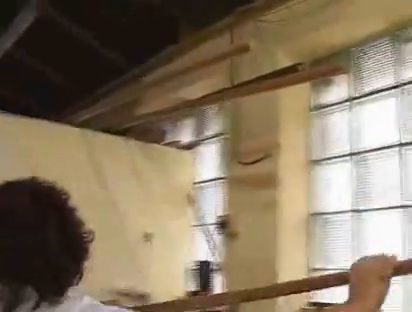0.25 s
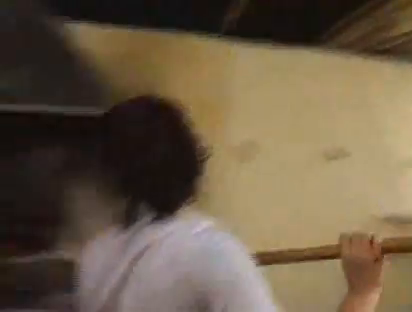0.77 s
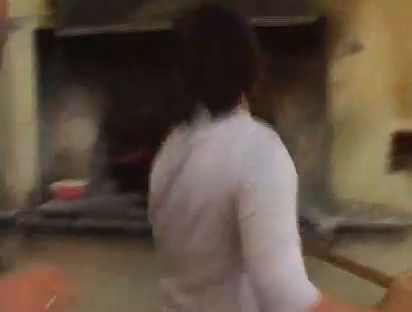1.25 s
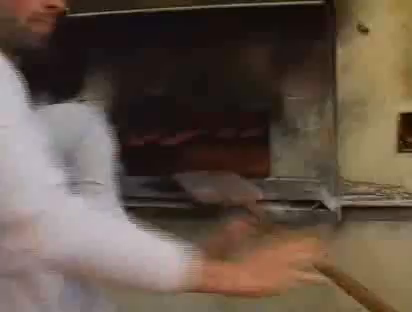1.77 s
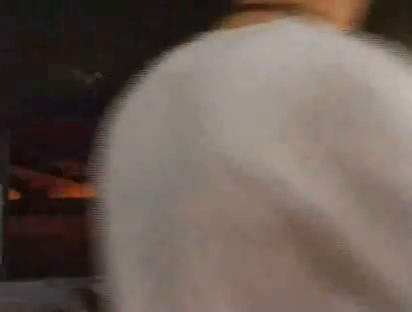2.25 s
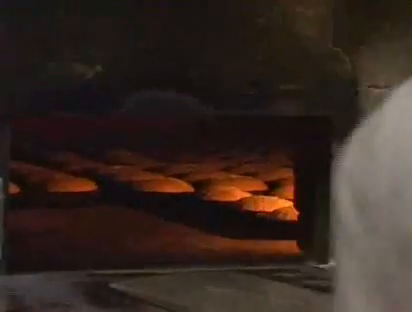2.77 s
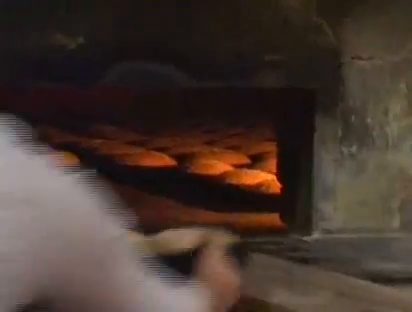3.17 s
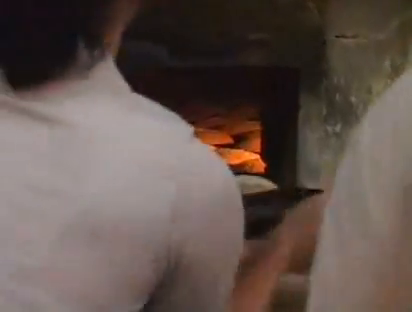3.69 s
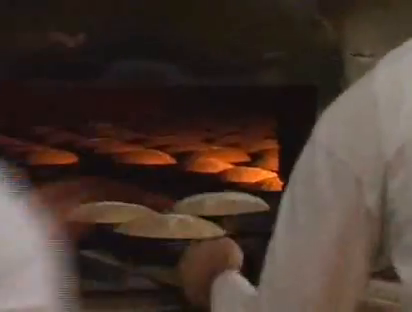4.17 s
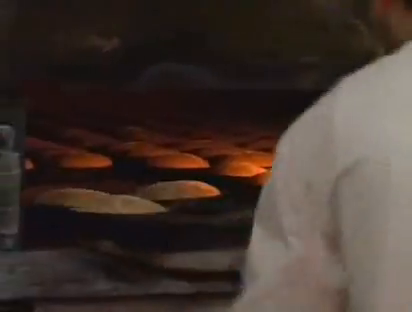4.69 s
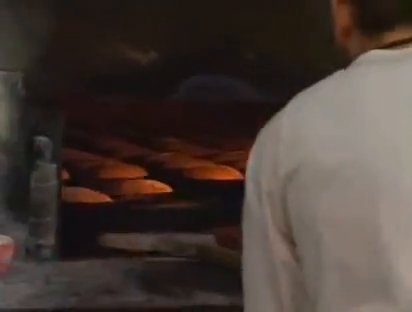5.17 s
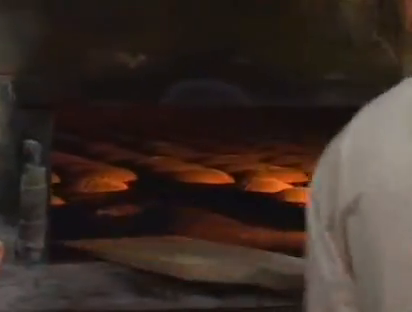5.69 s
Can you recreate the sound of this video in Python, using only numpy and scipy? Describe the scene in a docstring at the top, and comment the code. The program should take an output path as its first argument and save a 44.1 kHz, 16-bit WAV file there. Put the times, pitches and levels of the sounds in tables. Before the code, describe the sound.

A long wooden peel knocks, clatters and scrapes over the floury stone of a bread oven in a hard-walled bakery.

```python
"""Wooden peel at a bread oven

A long wooden peel knocks and clatters on the mouth and floor of the oven, then is loaded and slid in.
Each blow rings the blade and shaft; wood rasps over floury stone in quick strokes and one long gritty push.
A loading board rings as it is set down, the blade as it springs free. The place is a hard-walled bakery,
with the peel straight ahead of a hand-held camera microphone that hears it nearly in mono."""
import sys
import numpy as np
from scipy import signal
from scipy.fft import rfft, irfft
from scipy.io import wavfile
from scipy.ndimage import uniform_filter1d, minimum_filter1d

SR = 44100
rng = np.random.default_rng(int(sys.argv[2]) if len(sys.argv) > 2 else 0)


def dump_mix(stems):
    """Bounce the given channels to the path in sys.argv[1] as a 16-bit WAV at rate SR."""
    frames = np.atleast_2d(stems).T  # one column per channel
    limited = np.clip(frames, -1, 1)  # hard clip at full scale
    pcm = np.round(limited * 32767).astype(np.int16)
    wavfile.write(sys.argv[1], SR, pcm)


N = 261954
TIME = np.arange(N) / SR
TAPS = 8192
FREQS = np.maximum(np.arange(TAPS // 2 + 1) * SR / TAPS, 1)

# Room tone of the bakery. Each row: frequency in Hz, relative level in dB.
ROOM_TONE_SPECTRUM = [(25, -4.5), (60, -10), (120, -9), (250, 3), (500, -1.5), (1000, -5), (2500, -9),
                      (5000, -13), (9000, -12.5), (13000, -11.5)]
# Echo off the walls. Each row: frequency in Hz, t60 in seconds, level against the direct sound in dB.
ECHO_BANDS = [(100, 0.8, 0), (256, 0.52, 3.5), (624, 0.44, 0.5), (1310, 0.49, -0.5), (3770, 0.37, -5),
              (8140, 0.32, -8.5), (13000, .3, -14)]
# How far left and right differ at the microphone. Each row: frequency in Hz, side gain in dB.
STEREO_WIDTH = [(60, -11), (150, -28), (380, -40), (700, -25.5), (1400, -24), (2500, -20), (5500, -18.5),
                (9000, -46), (13000, -31)]
# The microphone's own colour. Each row: frequency in Hz, gain in dB.
MIC_RESPONSE = [(30, -3), (90, -1), (1300, 0), (3500, 0), (5200, 0.5), (7500, -1), (10500, -1), (12800, -3)]
# Faint rumble, unrelated in the two channels. Each row: frequency in Hz, relative level in dB.
MIC_RUMBLE_SPECTRUM = [(20, 1), (45, 9), (100, -13), (250, -22), (1000, -34), (8000, -50)]
# Modes of the loading board and the thin blade. Each row: frequency in Hz, level in dB, t60 in seconds.
BOARD_MODES = [(656, -26, 0.71), (990, -53, 0.37), (1280, -30.5, 0.55), (1744, -54, .3), (2070, -29, 0.43),
               (2630, -45, 0.64)]
BLADE_MODES = [(1160, -39, 0.61), (1440, -24, 0.32), (1650, -35, 0.17), (2002, -22.5, 0.21),
               (2560, -28, 0.13), (2660, -30, 0.17), (3380, -28.5, 0.17)]
# Resonances of peel and oven mouth. Each row: frequency in Hz, width in Hz, relative lift in dB.
PEEL_MODES = [(139, 20, 3), (233, 53, 3), (359.3, 38, 2), (465, 13, -1.5), (757, 48, 1.5), (983, 36, -0.5),
              (1172, 17, 2.5), (1584, 30, 0), (1750, 41, 0.5), (1940, 47, 1.5), (2243, 120, 2.5),
              (2500, 170, 0), (3260, 150, 0.5), (4950, 250, 2.5)]
# Quick strokes over floury stone. Each row: fastest moment, rise and fall in seconds, relative level
# in dB, hiss centre in Hz, loss an octave above it in dB, shaft rumble against the hiss in dB.
STROKES = [ (.605, 0.045, 0.039, -43, 3970, 7, -31), (0.949, 0.033, 0.028, -36.5, 7260, 23, 4),
           (1.41, 0.051, .025, -41, 7400, 20, -8), (1.581, 0.025, 0.022, -40, 6660, 18, -14),
           (1.672, 0.021, 0.026, -34, 7860, 14, -7.5), (2.497, 0.026, 0.062, -27, 5070, 14, -6.5),
           (2.872, 0.023, 0.028, -37, 4580, 7, -19), (4.501, 0.038, 0.015, -38.5, 4500, 14.5, -33),
           (5.625, 0.015, 0.12, -34, 3770, 15, -7.5), ]
# Juddering shaft, rasping grit and shaken wood. Each row: frequency in Hz, relative level in dB.
SHAFT_SPECTRUM = [(50, -55), (100, -5), (150, 0.5), (300, 4.5), (480, 6.5), (750, -6.5), (1500, -4.5),
                  (4000, -26)]
RASP_SPECTRUM = [(300, -32), (1500, -12), (3200, -0.5), (4800, 1), (7000, -2), (10000, -10), (13000, -15)]
WOOD_SPECTRUM = [(60, -23), (130, -15), (280, -1.5), (600, -3.5), (1350, 0.5), (2400, -4), (4000, -7),
                 (8000, -33)]
# Slow slides as the peel is shifted and loaded. Each row: start in seconds, length in seconds,
# speed as a gain in dB, load against that gain in dB.
SLIDES = [(0, 0.033, -56.5, 2.5), (0.286, 0.62, -63.5, -9), (1.0, 0.43, -47.5, 6), (1.8, 0.092, -48, 0.5),
          (1.969, 0.75, -48.5, -1.5), (2.995, 0.083, -52, -1.5), (3.165, 0.16, -52.5, -8),
          (3.348, 0.45, -44, -2.5), (3.846, 0.3, -57, 6), (4.14, 0.19, -48, 1), (4.332, 0.29, -45.5, -6)]
# The long push into the oven and back. Each row: time in seconds, relative speed and load in dB.
LONG_PUSH = [(4.72, -46, -41), (4.76, -49, -39.5), (4.99, -45.5, -41.5), (5.12, -48, -40),
             (5.23, -52.5, -43.5), (5.438, -47.5, -53.5), (5.572, -43.5, -41), (5.706, -46.5, -34),
             (5.828, -42.5, -44), (5.92, -56, -49)]
# Tone of a blow: weight fills the bass, hardness opens the treble. Each row: frequency in Hz,
# base level in dB, dB added per dB of weight, dB added per dB of hardness.
BLOW_SPECTRUM = [(65, -32, 1, 0), (133.7, -7.5, 0.5, 0), (220, .5, 1, 0), (580, 2, .5, 0),
                 (1416, 1.5, 0, 0), (3440, -0.5, 0, 1), (8380, -11, 0, 2.4), (13000, -30.5, 0, 0.6)]
# Blows of wood on stone, each favouring one note by where the peel is struck. Each row: start in seconds,
# relative level in dB, weight in dB, contact hardness in dB, clatter time in seconds, note in Hz.
KNOCKS = [(.075, -20, -7, 1, 0.017, 1030), (0.419, -31, 0, 7.5, .008, 8000),
          (.461, -21.5, -10, 6, .02, 1760), (.772, -24.5, -5, 6.5, 0.012, 4770),
          (.84, 17, -0.5, -2.5, 0.019, 235), (.948, 6.5, -4, 1, 0.011, 600),
          (.956, 17, -0.5, -1.5, .013, 4900), (1.013, 10.5, -5, -4, 0.012, 347),
          (1.127, 12, -3.5, -5.5, 0.02, 3130), (1.158, 18.5, -2, -3, .009, 4840),
          (1.335, 23, -9, -11.5, .016, 880), (1.498, 17.5, -0.5, -7.5, 0.035, 604),
          (2.119, 28.5, -8, -8, 0.019, 965), (2.166, 18.5, 1, -5.5, 0.034, 358),
          (2.332, 13, 5.5, -16.5, 0.0094, 810), (2.345, 12.5, 4.5, -12, 0.018, 460),
          (3.315, 18.5, -6.5, -9, .014, 1570), (3.61, 4, -18, -13, 0.017, 1300),
          (3.735, 10.5, -13.5, -1.5, 0.015, 4950), (4.018, 21, -16, -11.5, 0.037, 670),
          (4.41, -7.5, 6, -1, 0.014, 285), (4.568, 7.5, -13.5, -3.5, .018, 2380),
          (4.712, 14, -17, -4, 0.0097, 2550), (4.808, 1.5, -10, -2, 0.013, 1670),
          (5.15, 3, -19, -4.5, 0.024, 3300), (5.403, 3, -25, -3, 0.011, 915),
          (5.532, 8.5, -8.5, -17, 0.011, 1600), (5.58, 11, -13, -2, 0.017, 350),
          (5.605, 11.5, -7.5, 0, 0.023, 363), (5.638, 2, 10.5, -15, 0.017, 355),
          (5.748, 16, -13.5, -4.5, 0.022, 2030)]


def undb(db):
    """Decibels to gain."""
    return 10 ** (np.asarray(db) / 20)


def unit(x):
    """Scale to rms 1."""
    return x / np.sqrt(np.mean(x ** 2))


def spectrum(points):
    """Join (Hz, dB) points on a log-frequency axis."""
    hz, db = np.transpose(points)
    return np.interp(np.log(FREQS), np.log(hz), db)


def bell(hz, width):
    """Shape of one resonance: 1 at its centre, a half at its edges."""
    return 1 / (1 + (2 * (FREQS - hz) / width) ** 2)


def colour(x, db):
    """Pass x through the minimum-phase filter that has this dB spectrum."""
    cepstrum = irfft(np.log(undb(db)))
    cepstrum[1:TAPS // 2] *= 2
    cepstrum[TAPS // 2 + 1:] = 0
    impulse = irfft(np.exp(rfft(cepstrum)))
    return signal.fftconvolve(x, impulse)[:len(x)]


def add(track, start_s, sound):
    """Mix a sound into the track."""
    start = max(int(start_s * SR), 0)
    part = sound[:max(N - start, 0)]
    track[start:start + len(part)] += part


def grit(samples, per_s, spread_db):
    """Random tiny impacts, a few much larger than the rest; rms 1."""
    size = undb(spread_db * np.minimum(rng.exponential(size=samples), 4))
    return unit(size * rng.standard_normal(samples) * (rng.random(samples) < per_s / SR))


def wander(per_s):
    """Smooth random drift with a spread near 1 and no wild excursions."""
    knots = 2 * np.tanh(rng.standard_normal(1024) / np.sqrt(2))
    return np.interp(TIME * per_s, np.arange(len(knots)), knots)


def room_tone(level_db=-57.5, waver_db=0.87):
    """The faint, slowly wavering air of the bakery."""
    gain = undb(level_db + waver_db * wander(per_s=2.6))
    return gain * unit(colour(rng.standard_normal(N), spectrum(ROOM_TONE_SPECTRUM)))


def wall_echo(build_s=0.0095):
    """The walls' diffuse response builds up after the direct sound; the treble dies first."""
    t, echo = np.arange(SR) / SR, 0
    hz, t60s, levels_db = np.transpose(ECHO_BANDS)
    noise, bins = rfft(rng.standard_normal(SR)), np.arange(SR // 2 + 1)
    build = 1 - np.exp(-(t / build_s) ** 4)
    edges = 60 * 2 ** (np.arange(17) / 2)  # half octaves
    for lo, hi in zip(edges, edges[1:]):
        t60, db = (np.interp(np.log(lo * hi) / 2, np.log(hz), column) for column in (t60s, levels_db))
        band = irfft(noise * ((bins >= lo) & (bins < hi)))
        tail = band * np.exp(-np.log(1000) * t / t60) * build
        echo += undb(db) * unit(tail) * np.sqrt(2 * (hi - lo)) / SR
    return echo


def evened(echo):
    """Level out narrow peaks and dips, so that the echo has no pitch of its own."""
    power = np.abs(rfft(echo)) ** 2
    power += 1e-6 * power.mean()
    excess_db = 10 * np.log10(uniform_filter1d(power, size=21) / uniform_filter1d(power, size=161))
    return colour(echo, -np.interp(FREQS, np.arange(len(power)), excess_db))


def free_ring(modes, start_s):
    """Board or blade rings on after a knock, each mode dying at its own rate."""
    track, t = np.zeros(N), np.arange(SR) / SR
    for hz, db, t60 in modes:
        add(track, start_s, undb(db) * np.cos(2 * np.pi * hz * t) * np.exp(-np.log(1000) * t / t60))
    return track


def peel_resonance():
    """The dB lift that the modes give to whatever shakes the peel."""
    return sum(db * bell(hz, width) for hz, width, db in PEEL_MODES) - 0.5


def flour_strokes(rise_db_per_octave=2.5, bass_cut_hz=350, flutter_db=1.5):
    """Fine flour hisses under a quick stroke while the shaft judders low."""
    track, t = np.zeros(N), np.arange(SR // 2) / SR - 1 / 4
    shaft_db = spectrum(SHAFT_SPECTRUM) + peel_resonance()
    bass_loss_db = 20 * np.log10(1 + (bass_cut_hz / FREQS) ** 2)
    for peak_s, rise_s, fall_s, db, centre_hz, loss_db, rumble_db in STROKES:
        speed = np.exp(-(t / np.where(t < 0, rise_s, fall_s)) ** 2 / 2)
        octaves = np.log2(FREQS / centre_hz)
        # the hiss thins gently below its centre, fast above it
        hiss_db = rise_db_per_octave * np.minimum(octaves, 0) - loss_db * np.maximum(octaves, 0) ** 1.5
        hiss = unit(colour(grit(len(t), per_s=16000, spread_db=0.5), hiss_db - bass_loss_db))
        rumble = unit(colour(grit(len(t), per_s=900, spread_db=3), shaft_db))
        add(track, peak_s + t[0], undb(db - 0.5) * speed * (hiss + undb(rumble_db) * rumble))
    return track * undb(flutter_db * wander(per_s=70))


def blade_chatter(width_hz=300, shift_db=5, shifts_per_s=26):
    """Slips shake the stone-damped blade; as the contact wanders, different modes stand out."""
    chatter = 0
    for hz, db, _ in BLADE_MODES:
        mode_db = 30 * np.log10(bell(hz, width_hz) + 1e-4)
        mode = unit(colour(grit(N, per_s=900, spread_db=2.5), mode_db))
        # pressed on the stone, the modes differ only half as much as when they ring free
        chatter += mode * undb(db / 2 + shift_db * wander(shifts_per_s))
    return unit(chatter)


def speed_and_load(push_fade_s=0.042, attack_s=0.03, release_s=0.043):
    """Two gains for the moving blade: the long push swells and eases; slides start, hold and die away."""
    times, speeds_db, loads_db = np.transpose(LONG_PUSH)
    pushing = np.clip(1 + np.minimum(TIME - times[0], times[-1] - TIME) / push_fade_s, 0, 1)
    speed = pushing * undb(np.interp(TIME, times, speeds_db) + 2.5)
    load = pushing * undb(np.interp(TIME, times, loads_db) + 1)
    for start_s, length_s, db, load_db in SLIDES:
        attack = np.clip((TIME - start_s) / attack_s, 0, 1)
        release = np.exp(-np.maximum(TIME - start_s - length_s, 0) / release_s)
        speed += undb(db) * attack * release
        load += undb(db + load_db) * attack * release
    return speed, load


def blade_drag(slip_db=2.1, slips_per_s=45, rasp_db=-1, wood_db=-4, chatter_db=-7):
    """The blade sticks and slips over grit: the grains rasp, and under load they shake the wood."""
    speed, load = speed_and_load()
    rasp = unit(colour(grit(N, per_s=16000, spread_db=1), spectrum(RASP_SPECTRUM)))
    wood = unit(colour(grit(N, per_s=2500, spread_db=3), spectrum(WOOD_SPECTRUM) + peel_resonance()))
    shaking = undb(wood_db) * wood + undb(chatter_db) * blade_chatter()
    stick_slip = undb(slip_db * wander(slips_per_s))
    return stick_slip * (undb(rasp_db) * speed * rasp + load * shaking)


def peel_knocks(tick_s=0.0045, note_lift_db=6):
    """Each blow is a sharp tick, then a dense clatter as the blade chatters and the oven reflects it."""
    track, t = np.zeros(N), np.arange(TAPS) / SR
    resonance_db = peel_resonance()
    hz, base_db, by_weight, by_hardness = np.transpose(BLOW_SPECTRUM)
    for start_s, db, weight, hardness, clatter_s, note_hz in KNOCKS:
        clatter = grit(TAPS, per_s=6000, spread_db=1.46) * np.exp(-(t / clatter_s) ** 2)
        # a shorter clatter and a harder contact put more of the energy in the tick
        tick_share = min((tick_s / clatter_s) ** 2 * undb(0.56 * hardness), 0.5)
        force = np.sqrt((1 - tick_share) / TAPS) * unit(clatter)
        force[0] += np.sqrt(tick_share)
        tone_db = spectrum(list(zip(hz, base_db + weight * by_weight + hardness * by_hardness)))
        width_hz = 118 * (note_hz / 1000) ** 1.63  # wood damps high notes faster, so they are broader
        note_db = note_lift_db * bell(note_hz, width_hz)
        add(track, start_s, colour(force, db + tone_db + resonance_db + note_db))
    return track


def scene():
    """The peel is straight ahead of the microphone; echo and room tone give a little width."""
    peel = peel_knocks() + flour_strokes() + blade_drag()
    rings = free_ring(BOARD_MODES, start_s=4.018) + free_ring(BLADE_MODES, start_s=5.752)
    echo = signal.fftconvolve(peel, evened(wall_echo()))[:N]
    mid = peel + rings + echo + room_tone()
    side_echo = signal.fftconvolve(peel + rings, wall_echo())[:N]
    side = colour(side_echo + room_tone(), spectrum(STEREO_WIDTH))
    return np.array([undb(0.3) * (mid + side), mid - side])


def limiter(x, ceiling=0.82):
    """Turn the gain down for a few milliseconds around the highest peaks."""
    gain = np.minimum(1, ceiling / (np.abs(x).max(axis=0) + 1e-9))
    return x * uniform_filter1d(minimum_filter1d(gain, size=181), size=181)


def record(dry, rumble_db=-84, top_hz=12700, drop_s=5.91):
    """The camera colours the sound, limits peaks, adds rumble and cuts the top; the end drops in level."""
    heard = limiter(np.array([colour(channel, spectrum(MIC_RESPONSE)) for channel in dry]))
    end_drop = np.interp(TIME, [drop_s - 0.003, drop_s + 0.003], [1, 0.25])
    rumble = np.array([unit(colour(rng.standard_normal(N), spectrum(MIC_RUMBLE_SPECTRUM))) for _ in dry])
    lowpass = signal.ellip(10, 0.2, 90, top_hz, fs=SR, output="sos")
    return signal.sosfilt(lowpass, heard * end_drop + undb(rumble_db) * rumble)


dry = scene()
out = record(dry)
dump_mix(out)
```